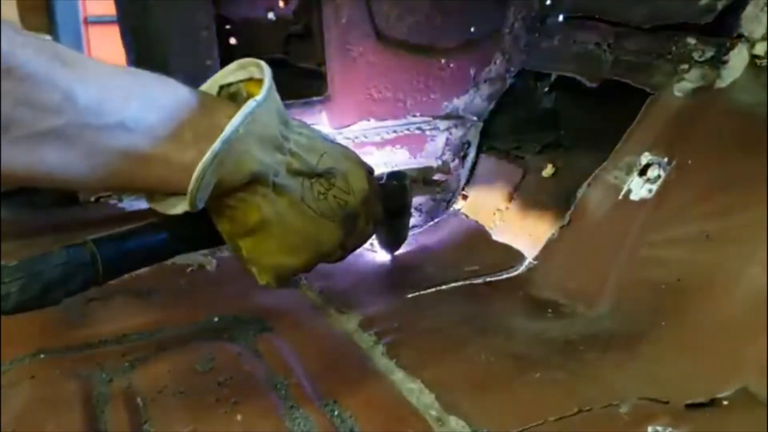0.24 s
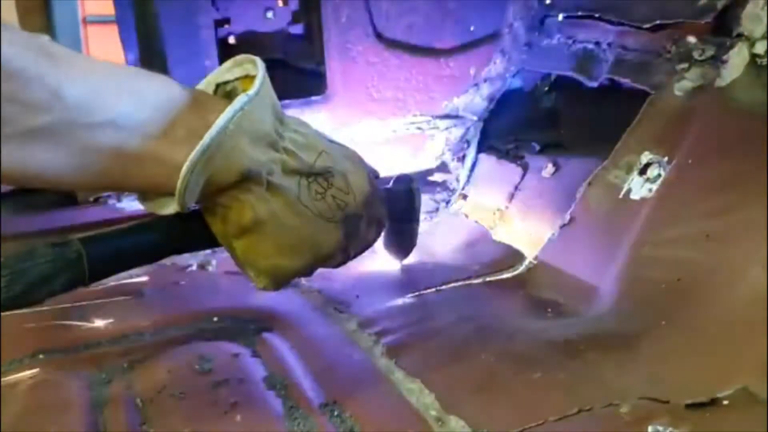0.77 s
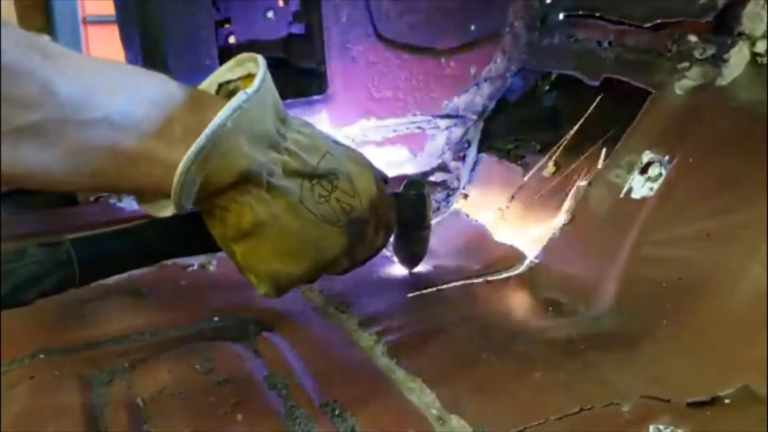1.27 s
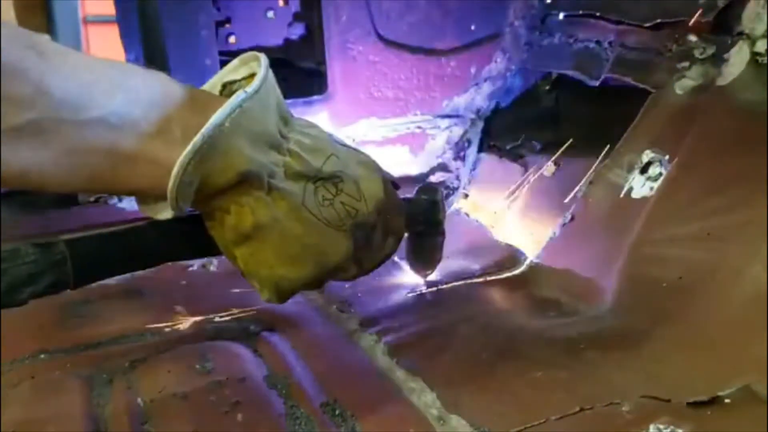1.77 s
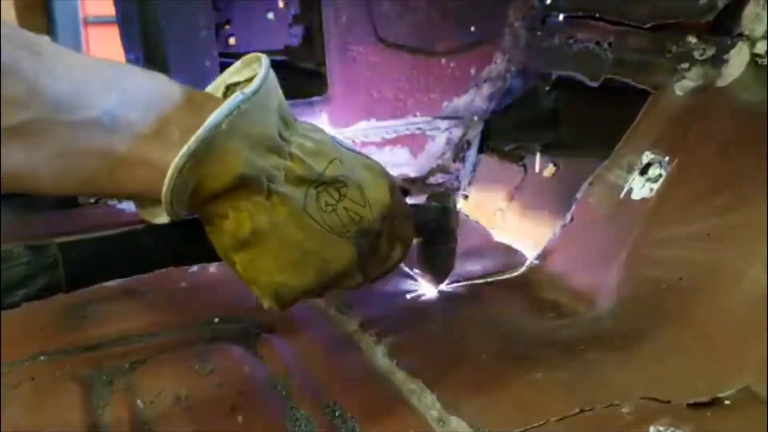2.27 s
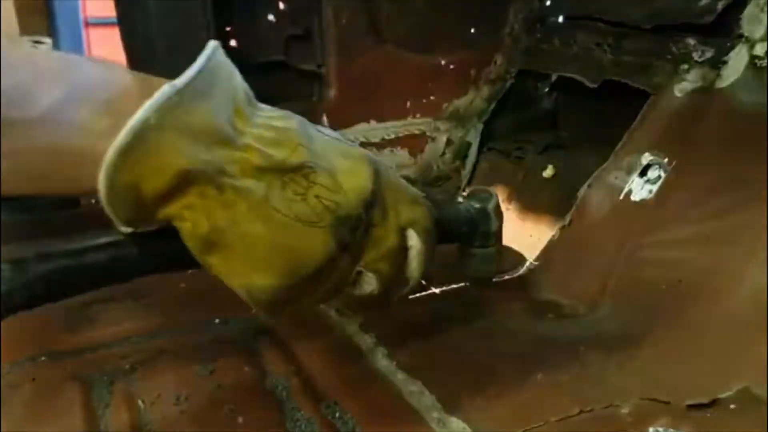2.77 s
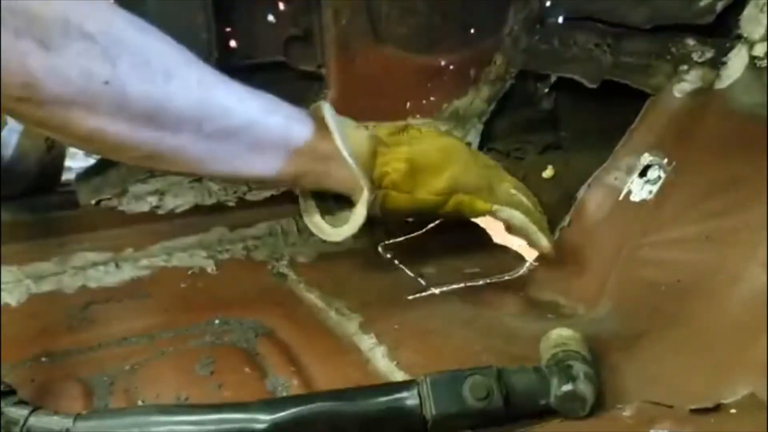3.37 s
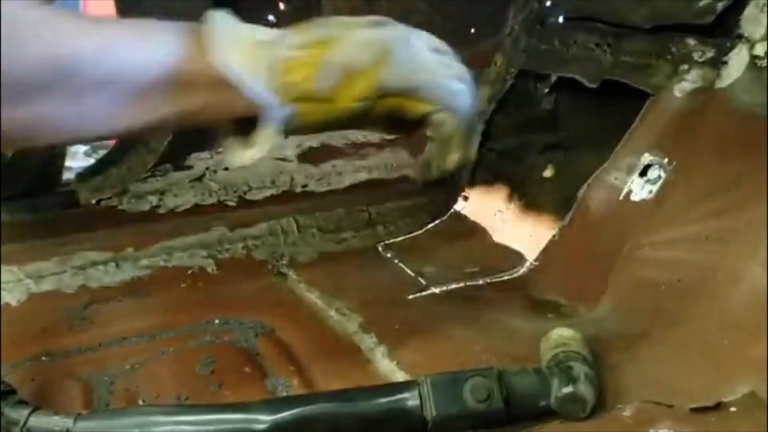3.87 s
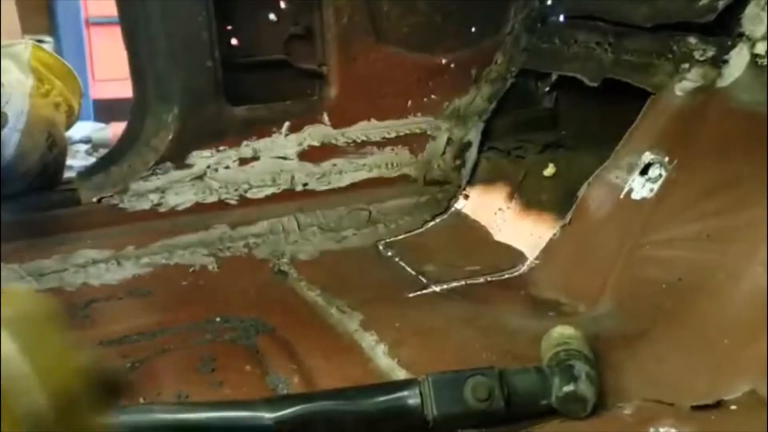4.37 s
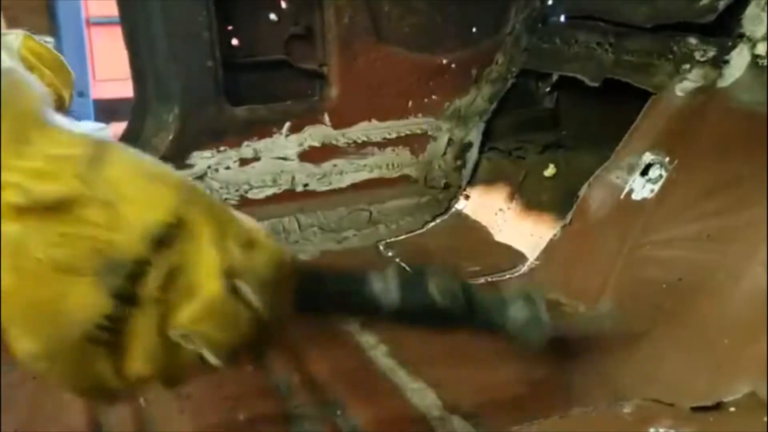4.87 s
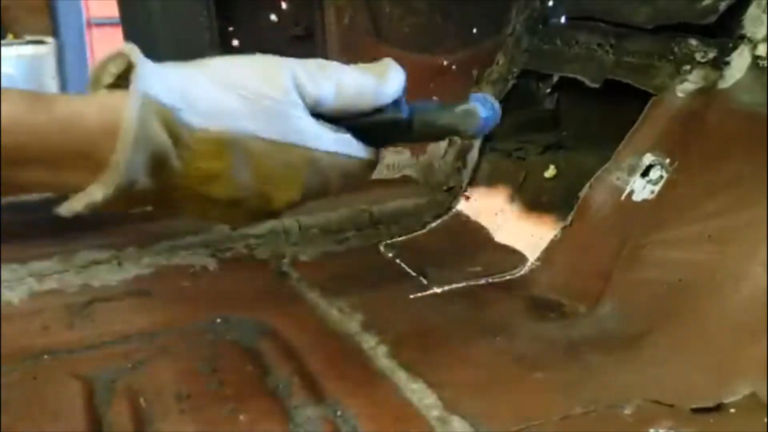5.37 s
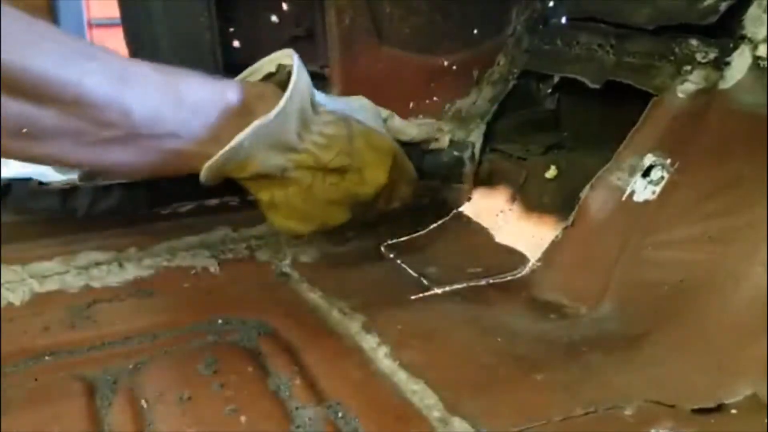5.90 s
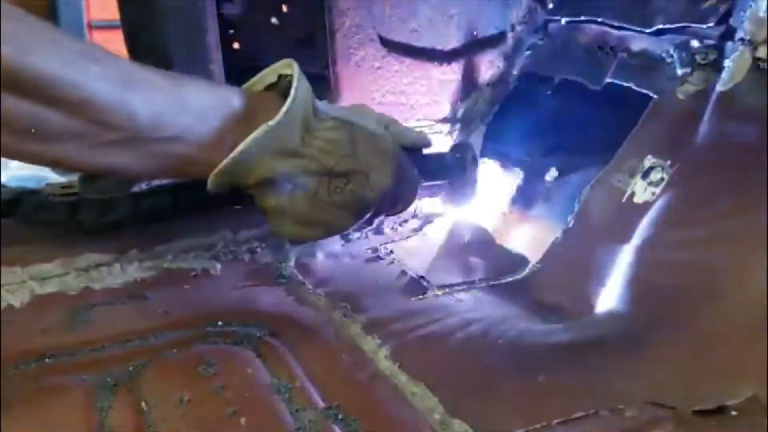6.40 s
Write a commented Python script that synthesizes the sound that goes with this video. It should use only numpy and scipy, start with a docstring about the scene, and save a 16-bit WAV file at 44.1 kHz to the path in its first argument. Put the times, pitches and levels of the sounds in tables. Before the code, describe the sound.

A plasma torch cuts metal with a whistling hiss, eases to blowing air amid knocks on a steel panel, then restarts.

```python
"""A plasma torch cuts a rusty steel floor pan. Its jet is rushing air: noise coloured by echoes off close
panels, with faint whistles from the nozzle and the cut. The arc goes out with a pop and the air keeps blowing
while the torch is laid down, the panel touched and the torch picked up, so the steel rings and scuffs. Then the
arc strikes again. A workshop rumbles underneath. The left microphone has a duller colour of its own, so it
hears less treble."""
import sys
import numpy as np
from scipy import signal
from scipy.fft import rfft, irfft
from scipy.io import wavfile

SR = 44100
rng = np.random.default_rng(int(sys.argv[2]) if len(sys.argv) > 2 else 0)


def bounce(signal):
    """Save signal as a 16-bit WAV file at the path given by the first command-line argument."""
    frames = np.transpose(np.atleast_2d(signal))
    limited = np.clip(frames, -1, 1)
    pcm = np.round(limited * 32767).astype(np.int16)
    wavfile.write(sys.argv[1], SR, pcm)


N = 292824
HZ = np.maximum(np.arange(N // 2 + 1) * SR / N, 1)   # the pitch of each point in a spectrum

# How alike noise is on the two sides: pitch_hz, likeness (0 to 1)
STEREO_LIKENESS = [(25, .3), (60, 0.56), (125, 0.8), (250, 0.59), (1000, 0.36), (2500, 0.28), (5000, 0.2),
                   (15000, 0.13)]
# Tone colour of the workshop's rumble: pitch_hz, level_db
RUMBLE_COLOUR = [(18, -50), (30, -10), (97, 1), (250, -0.5), (331, -9), (450, -4), (580, -28), (990, -120)]
# Loudness of that rumble: time_s, level_db
RUMBLE_LEVELS = [(0, -58), (1.0, -59), (2.2, -59), (2.6, -58.5), (3.6, -56.5), (4.6, -56), (5.0, -57.5),
                 (5.5, -56), (5.9, -54), (6.3, -57.5), (6.64, -57.5)]
# The steel pan's own tones: pitch_hz, level_db, ring_s (time to fade by 60 dB)
PAN_TONES = [(62, -7, .4), (97, -3.5, 2.27), (151, -1, 1.07), (157, -9, 0.28), (160.6, 3, 0.23),
             (192.5, 1, 0.22), (246, 8.5, 0.21), (269.7, 3.5, 0.54), (357, 9, 0.22), (448, 10, 0.42),
             (493, -10, .3), (541, 9, .35), (574, 1, 0.43), (700, -3, 0.3), (850, -13, 0.3),
             (1250, -14, .2), (1570, -15, .2), (1920, -8, .15), (2622, -6, .2), (3214, -12, .18),
             (3892, -2, .14), (4242, -12, .2), (5050, -12, .2), (5500, -13, .15)]
# Torch, hose and hand knock on the pan: start_s, strength_db, spot_pitch_hz, cutoff_hz, longest_ring_s
PAN_KNOCKS = [(0.409, -42, 155, 300, .15), (2.306, -27, 70, 300, 0.11), (2.335, -28, 97, 400, 0.073),
              (2.981, -27, 186, 1500, 0.37), (2.984, -27, 1570, 5000, .07), (2.986, -24, 4400, 8000, .07),
              (3.0224, -17, 155, 250, 0.27), (3.02, -26, 850, 3000, 0.11), (3.022, -27, 4200, 8000, .1),
              (3.044, -29, 3700, 8000, .12), (3.055, -39, 560, 1500, 0.18), (3.078, -37, 4000, 8000, .06),
              (3.103, -37, 2600, 6000, .07), (3.126, -36, 4240, 8000, .04), (3.149, -33, 3000, 6000, .07),
              (3.152, -40, 850, 2000, 0.11), (3.099, -30, 151, 900, 0.24), (3.158, -32.5, 151, 900, 1.2),
              (3.409, -39.5, 140, 300, 0.16), (3.668, -32.5, 97, 900, 0.51), (4.262, -44, 357, 900, 0.25),
              (4.288, -42, 333, 700, .18), (4.325, -44, 560, 1200, .15), (4.269, -40, 62, 300, 0.34),
              (4.304, -35, 580, 1200, 0.18), (4.34, -37, 70.5, 300, 0.33), (4.673, -42.5, 156, 300, 0.23),
              (4.76, -44, 174, 500, 0.27), (4.756, -41, 700, 3000, .12), (4.801, -40, 157, 500, 0.93),
              (4.81, -42, 560, 1200, .15), (4.862, -39, 700, 1500, 0.22), (4.861, -41, 154, 500, 0.29),
              (4.937, -46, 245, 500, 0.43), (5.37, -39.5, 97, 300, 0.38), (5.548, -38, 245, 400, 0.18),
              (5.59, -42, 70.6, 300, .15), (5.601, -30, 244, 300, 0.14), (5.651, -37.5, 244, 300, .25),
              (5.995, -37.5, 144, 300, 0.13), (6.368, -47, 250, 400, 0.15), (6.483, -38.5, 156, 300, 0.33)]
# Glove, hose and torch scuff the pan:
# start_s, rise_s, hold_s, fade_s, strength_db, centre_hz, treble_fall_db_per_octave
PAN_DRAGS = [(0.169, 0.021, .03, .05, -37.5, 1200, 1), (.24, 0.025, .12, 0.057, -51, 430, -5),
             (2.979, 0.0036, 0.0067, 0.052, -26.5, 1290, -2), (3.013, 0.0043, 0.03, 0.12, -37, 453, -3.5),
             (3.141, 0.0066, 0.017, 0.13, -43, 600, 3), (4.136, 0.042, 0.0091, 0.11, -52, 406, 11),
             (4.255, 0.0049, 0.078, 0.098, -43, 513, -0.5), (4.749, .006, .13, 0.084, -46.5, 520, -2),
             (5.555, 0.021, 0.022, 0.1, -46, 420, 5), (5.602, 0.079, 0.034, 0.07, -40, 606, 2.5),
             (5.682, 0.05, 0.1, 0.041, -42.5, 800, -4.5), (5.849, 0.037, 0.13, 0.036, -45, 760, -4.5)]
# The arc breaks and strikes: start_s, peak_db
ARC_POPS = [(2.661, -16.5), (2.667, -25), (5.9681, -16), (5.972, -36)]
# Whistles of the nozzle and the cut: start_s, length_s, pitch_hz, width_hz, level_db, left_gain_db
AIR_WHISTLES = [(.15, .27, 4500, 250, -33, -11), (0, .2, 3900, 80, -38, -10), (.8, 1.3, 4160, 70, -34, -10),
                (1.25, 1.05, 4680, 110, -32, -12), (1.1, .5, 3480, 70, -38, -6),
                (2.08, .17, 6050, 120, -35, -12), (2.06, .2, 3150, 90, -40, -6),
                (.7, .55, 4800, 60, -36, -12), (1.3, .95, 5000, 50, -37, -12),
                (.8, 1.2, 5420, 90, -38, -12), (1.7, .55, 5860, 50, -38, -12), (.6, 1.6, 646, 35, -56, -3),
                (.6, 1.6, 1320, 80, -51, -5), (2.53, .04, 4150, 100, -31, -10),
                (2.635, .035, 4150, 100, -30, -10), (2.58, .09, 4720, 90, -33, -12),
                (2.55, .05, 1020, 60, -47, -4), (2.53, .03, 5100, 150, -30, -12),
                (3.2, 1.5, 4630, 120, -46, -12), (.7, .4, 10870, 60, -42, -9),
                (1.5, .7, 14970, 150, -33, -16), (.6, .6, 15590, 50, -37, -16),
                (2.41, .06, 2000, 70, -46, -4), (2.47, .07, 1750, 60, -43, -4),
                (3.0, 1.8, 12400, 200, -36.5, -15), (5.96, .5, 15240, 280, -23, -16),
                (5.96, .44, 13870, 150, -27, -14), (5.96, .43, 14380, 90, -31, -14),
                (6.0, .4, 11910, 50, -36, -10), (6.2, .2, 11320, 60, -37, -10),
                (6.0, .4, 13290, 50, -40, -12)]
# How late the jet reaches the left microphone as the torch moves: time_s, delay_ms
LEFT_DELAY = [(0, .05), (.6, -.04), (2.0, -.03), (2.7, 0), (3.1, .22), (4.9, .22), (5.3, .1), (5.8, .06),
              (6.64, .04)]
# Echoes off the close panels: left_delay_ms, right_delay_ms, level_db
PANEL_ECHOES = [(1.05, 1.3, -15), (1.45, 1.6, -14), (2.7, 2.1, -16), (3.4, 2.6, -16), (4.3, 5.1, -15),
                (7.3, 6.6, -14), (9.7, 11.2, -13), (14.9, 13.1, -13), (18.3, 21.4, -14), (26.2, 24.5, -15)]
# Tone colour of the jet at each microphone: pitch_hz, left_db, right_db
JET_COLOUR = [(94.5, -34, -32), (640, -21, -19), (1210, -21, -14.5), (2260, -18, -14), (3000, -15, -6),
              (3060, -10.5, -8), (4360, -17.5, -2), (5860, -19, -3.5), (6780, -18.5, -6.5),
              (7640, -23.5, -16), (9860, -14, -11), (9740, -19.5, -12), (12900, -15.5, -1.5),
              (15700, -17.5, 2)]
# Top edges of the jet's four ranges (roar, rush, hiss, sizzle): pitch_hz
JET_RANGE_TOPS = [3100, 7600, 12800, 15750]
# The jet swells as the torch nears the steel: time_s, sizzle_db, rush_vs_sizzle_db, roar_vs_sizzle_db
JET_LEVELS = [(0.0, -28, -6, -12), (0.2, -29.5, -3, -11.5), (0.34, -26, -2, -11), (0.4, -23, -7.5, -17),
              (0.49, -22, -9, -21), (0.64, -30.5, -3.5, -14), (0.74, -25.5, -4, -18),
              (0.92, -24, -7, -17.5), (1.02, -24.5, -7, -18), (1.2, -23.5, -8, -18.5),
              (1.45, -26, -5.5, -16), (1.65, -24, -6, -18), (2.0, -29, -3, -13.5), (2.19, -25, -4, -16.5),
              (2.3, -29, -2, -13.5), (2.52, -31.5, -3, -15), (2.55, -24.5, -7, -18.5),
              (2.66, -24.5, -4, -15), (2.685, -35.5, -5, -9), (2.76, -33.5, -9, -16),
              (2.95, -35, -6.5, -12), (3.4, -36, -5, -16), (4.33, -32.5, -5.5, -17),
              (4.89, -32, -6.5, -17.5), (5.11, -27.5, -7, -20), (5.21, -29.5, -4.5, -18.5),
              (5.31, -28.5, -6, -20), (5.53, -28, -6.5, -19), (5.75, -28, -5.5, -18), (5.87, -27, 1.5, -13),
              (5.92, -23.5, -5, -16.5), (5.99, -26.5, -3.5, -15), (6.13, -26.5, -6, -14),
              (6.3, -23, -8, -16.5), (6.38, -25, -6, -16.5), (6.45, -33, -1, -11.5),
              (6.64, -34.5, -0.5, -8.5)]
# The jet dips or flares briefly: time_s, lead_in_s, recovery_s, change_db
JET_DIPS = [(.205, .02, .025, 3), (.365, .03, .02, -3), (.68, .01, .02, 3), (1.295, .05, .012, -4),
            (1.88, .06, .015, -2), (1.97, .03, .03, 2), (2.2, .02, .02, 2.5), (2.05, .03, .03, -3),
            (2.28, .05, .025, -4), (2.34, .03, .03, -5), (2.545, .015, .02, 4), (5.965, .045, .003, -7),
            (5.971, .003, .01, 1.5)]


def from_db(db):
    """Turn decibels into a number to multiply by."""
    return 10 ** (np.asarray(db) / 20)


def unit_level(x):
    """Scale a signal so that the average of its channels has a level (rms) of 1."""
    return x / np.sqrt(np.mean(np.atleast_2d(x).mean(axis=0) ** 2) + 1e-20)


def in_time(rows):
    """Join a table's points with straight lines: one curve in time for each value column."""
    times_s, *columns = np.transpose(rows)
    return [np.interp(np.arange(N) / SR, times_s, column) for column in columns]


def at_hz(rows, hz, column=1):
    """Look up a table's value at any pitch, with octaves evenly spaced."""
    table = np.array(rows)
    return np.interp(np.log(hz), np.log(table[:, 0]), table[:, column])


def drift(rate_hz):
    """A smooth random wobble, about 1 in size; a higher rate wobbles faster."""
    step = 40   # samples between points
    memory = np.exp(-2 * np.pi * step * rate_hz / SR)
    noise = rng.standard_normal(N // step + 2002)
    slow = signal.lfilter([1], [1, -2 * memory, memory * memory], noise)[2000:]
    return np.interp(np.arange(N) / step, np.arange(len(slow)), unit_level(slow))


def ring(pushes, hz, ring_s):
    """Every push starts a tone that fades by 60 dB in ring_s."""
    decay, angle = from_db(-60 / (ring_s * SR)), 2 * np.pi * hz / SR
    feedback = [1, -2 * decay * np.cos(angle), decay * decay]
    return signal.lfilter([1, -1], feedback, pushes + 1e-18) * np.cos(angle / 2)


def stereo_noise():
    """Left and right spectra of white noise, most alike in the bass."""
    shared, opposite = rfft(rng.standard_normal((2, N)))
    alike = at_hz(STEREO_LIKENESS, HZ)
    return np.sqrt(1 + alike) * shared + np.sqrt(1 - alike) * opposite * [[1], [-1]]


def workshop():
    """The low, uneven rumble of fans and a far compressor."""
    level_db = in_time(RUMBLE_LEVELS)[0] + 1.6 * drift(rate_hz=6)
    rumble = irfft(stereo_noise() * from_db(at_hz(RUMBLE_COLOUR, HZ)), N)
    return from_db(level_db) * unit_level(rumble)


def colour_left(tone, hz):
    """Make a tone stereo: weaker on the left, and late by a small random time."""
    left_gain = from_db(at_hz(JET_COLOUR, hz, column=1) - at_hz(JET_COLOUR, hz, column=2))
    delay_ms = abs(rng.normal(0, 0.6)) * min(1, hz / 300) ** 2   # long waves reach both sides together
    delayed = np.pad(tone, (int(delay_ms * SR / 1000), 0))[:len(tone)]
    return np.array([left_gain * delayed, tone])


def pan_knocks():
    """A knock rings the tones near its spot's pitch; a soft touch dulls them, a load cuts them short."""
    out, t = np.zeros((2, N + SR)), np.arange(SR) / SR
    for start_s, strength_db, spot_hz, cutoff_hz, longest_ring_s in PAN_KNOCKS:
        start = int(start_s * SR)
        for hz, level_db, ring_s in PAN_TONES:
            octaves_away = min(abs(np.log2(hz / spot_hz)), 1.5)
            height = from_db(strength_db + level_db - 18 * octaves_away) / (1 + (hz / cutoff_hz) ** 2)
            swell = 1 - np.exp(-t * hz / 0.45)   # the push builds over about half a cycle
            fade = from_db(-60 * t / min(ring_s, longest_ring_s))
            tone = height * swell * fade * np.sin(2 * np.pi * hz * t)
            out[:, start:start + SR] += colour_left(tone, hz)
    return out[:, :N]


def pan_drags():
    """Dragging over grit makes many tiny clicks; a hand on the steel keeps their ringing short."""
    out, t = np.zeros((2, N)), np.arange(SR // 2) / SR
    grains_per_s, edge_db, mix_db = 8000, -16, -16
    for start_s, rise_s, hold_s, fade_s, strength_db, centre_hz, treble_fall in PAN_DRAGS:
        start = int(start_s * SR)
        corners_s = np.cumsum([0, rise_s, hold_s, fade_s])
        shape_db = np.interp(t, corners_s, [edge_db, 0, 0, edge_db])
        stroke = from_db(strength_db + shape_db) * (t < corners_s[-1])
        grains = rng.random(len(t)) < grains_per_s / SR
        grain_db = 1.8 * np.minimum(rng.exponential(1, len(t)), 5)
        grit = stroke * grains * from_db(grain_db)
        for hz in np.geomspace(130, 6000, num=22):
            octaves = np.log2(hz / centre_hz)
            colour_db = -treble_fall * max(octaves, 0) + 10 * min(octaves, 0)
            clicks = grit * rng.standard_normal(len(t)) * from_db(colour_db)
            scuff = ring(clicks, hz, ring_s=22.6 / hz + 0.0033)
            out[:, start:start + len(t)] += colour_left(scuff, hz)
    return from_db(mix_db) * out


def arc_pops():
    """The arc breaks or strikes: a sharp tick of pressure and a puff that dies away at once."""
    out, t = np.zeros((2, N)), np.arange(int(.05 * SR)) / SR
    band = signal.butter(2, [120, 1900], "band", fs=SR, output="sos")
    side_gains = from_db([[-3], [0]])   # left, right
    for start_s, peak_db in ARC_POPS:
        start = int(start_s * SR)
        burst = rng.standard_normal(len(t)) * np.exp(-t / 0.011)
        burst[0] += 20   # the tick
        pop = signal.sosfilt(band, burst)
        out[:, start:start + len(t)] += from_db(peak_db) * pop / np.abs(pop).max() * side_gains
    return out


def whistles():
    """Air whistles in the nozzle and the cut: noise narrowed to one pitch, wavering in strength."""
    out, waver_db = np.zeros((2, N)), 2.5 * drift(rate_hz=6)
    for start_s, length_s, hz, width_hz, level_db, left_db in AIR_WHISTLES:
        start, end = int(start_s * SR), min(int((start_s + length_s) * SR), N)
        length = end - start
        noise = rng.standard_normal((2, length))
        ring_s = np.log(1000) / (np.pi * 1.5 * width_hz)   # a narrower whistle rings longer
        tone = ring(ring(noise, hz, ring_s), hz, ring_s)
        age = np.arange(length)
        fade_in = np.minimum(1, age / (.1 * length if length_s > .52 else .01 * SR))
        fade_out = np.minimum(1, age[::-1] / (.12 * length))
        waver = from_db(np.roll(waver_db, rng.integers(N))[start:end])
        side_gains = from_db([[level_db + left_db], [level_db]])
        out[:, start:end] += side_gains * fade_in * fade_out * waver * tone / tone.std()
    return out


def torch_movement(spectra):
    """Turn two spectra into sound that reaches the left a little late or early as the torch moves."""
    delay = in_time(LEFT_DELAY)[0] * SR / 1000
    fine_left = 4 * irfft(spectra[0], 4 * N)   # four points a sample, for very small delays
    left = np.interp(np.arange(N) - delay, np.arange(4 * N) / 4, fine_left)
    return np.array([left, irfft(spectra[1], N)])


def panel_echoes(sound, wander_ms):
    """Short echoes boost some pitches and cancel others; their paths shift as the torch moves."""
    out, samples = sound.copy(), np.arange(N)
    for left_ms, right_ms, level_db in PANEL_ECHOES:
        shift_ms = wander_ms * drift(rate_hz=0.65)
        for side, delay_ms in enumerate((left_ms, right_ms)):
            delay = (delay_ms + shift_ms) * SR / 1000
            out[side] += from_db(level_db) * np.interp(samples - delay, samples, sound[side])
    return out


def rushing_air():
    """Swirling air: overlapping bands of noise that follow their range's level and flicker separately."""
    sizzle_db, rush_db, roar_db = in_time(JET_LEVELS)
    hiss_db = -1.5 + 0.52 * rush_db   # the hiss partly follows the rush
    vs_sizzle_db, flicker_db = [roar_db, rush_db, hiss_db, 0], [1.4, 0.96, 1.1, 0.73]   # one per range
    noise = panel_echoes(torch_movement(stereo_noise()), wander_ms=0.099)
    colour_db = [at_hz(JET_COLOUR, HZ, column=1), at_hz(JET_COLOUR, HZ, column=2)]
    spectrum = rfft(noise) * from_db(colour_db)
    power = np.abs(spectrum.mean(axis=0)) ** 2 * 2 / N ** 2
    range_of_pitch = np.digitize(HZ, JET_RANGE_TOPS)
    centres_hz = np.array([250, 700, 1400, 2100, 2900, 3800, 5000, 6500, 8400,
                           10200, 12000, 13600, 15200])
    out = np.zeros((2, N))
    for hz in centres_hz:
        which = np.digitize(hz, JET_RANGE_TOPS)
        band = np.interp(HZ, centres_hz, centres_hz == hz)   # triangles that add up to one
        range_level = np.sqrt(power[range_of_pitch == which].sum())
        gain = from_db(vs_sizzle_db[which] + flicker_db[which] * drift(rate_hz=5.9)) / range_level
        out += gain * irfft(spectrum * band, N)
    return from_db(sizzle_db) * out


def torch_jet():
    """Air and whistles dip and flare together, and the arc's sputter shakes their level."""
    air = rushing_air() + whistles()
    dips_db = sum(in_time([(time_s - lead_s, 0), (time_s, change_db), (time_s + recovery_s, 0)])[0]
                  for time_s, lead_s, recovery_s, change_db in JET_DIPS)
    sputter_db = 0.345 * drift(rate_hz=2.3) + 0.352 * drift(rate_hz=44)
    return air * from_db(dips_db + sputter_db)


def scene():
    """All the sounds together, left and right."""
    return torch_jet() + pan_knocks() + pan_drags() + arc_pops() + workshop()


def record(dry):
    """The microphones lose the deep bass and cut off the highest treble steeply."""
    bass_cut = signal.butter(2, 60, "high", fs=SR, output="sos")
    treble_cut = signal.ellip(14, .3, 80, 15750, fs=SR, output="sos")
    return signal.sosfilt(treble_cut, signal.sosfilt(bass_cut, dry))


dry = scene()
out = record(dry)
bounce(out)
```